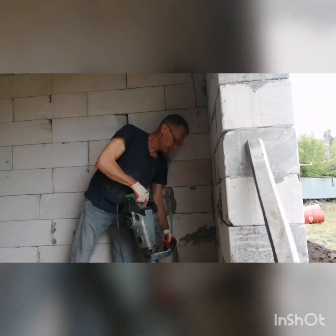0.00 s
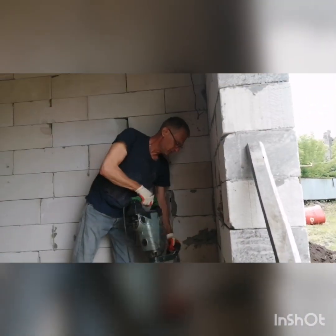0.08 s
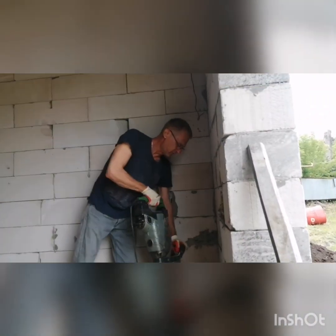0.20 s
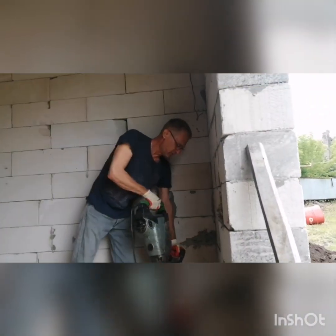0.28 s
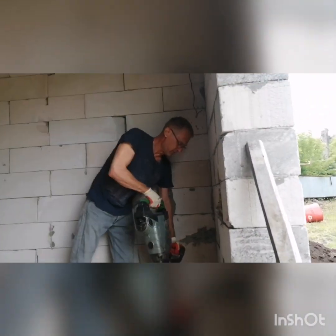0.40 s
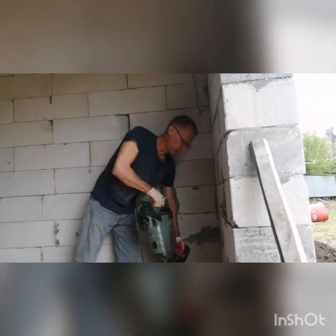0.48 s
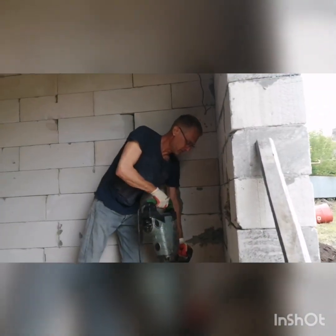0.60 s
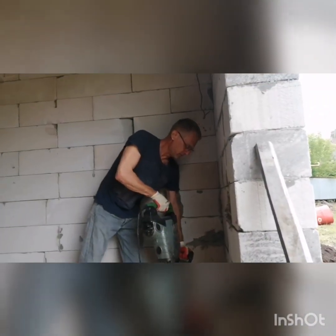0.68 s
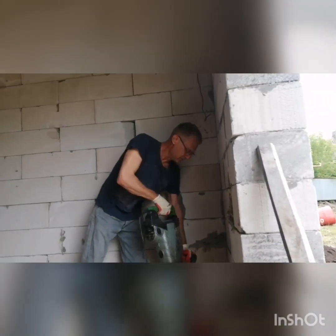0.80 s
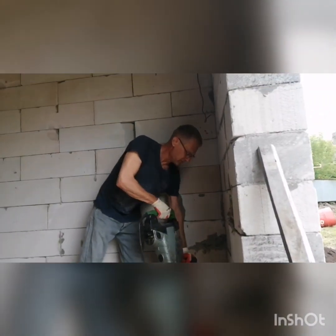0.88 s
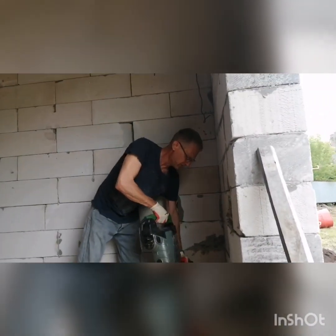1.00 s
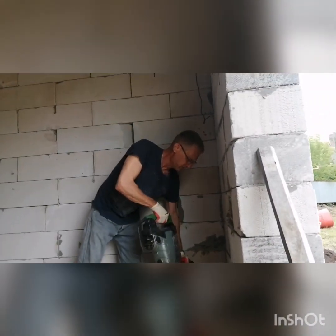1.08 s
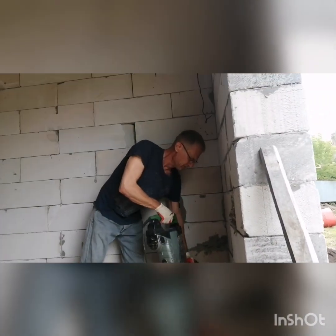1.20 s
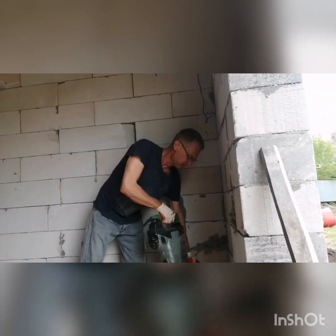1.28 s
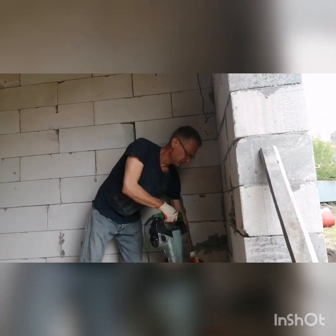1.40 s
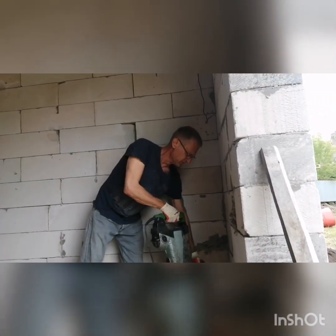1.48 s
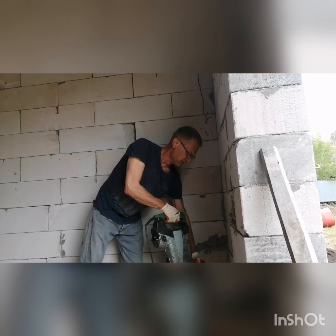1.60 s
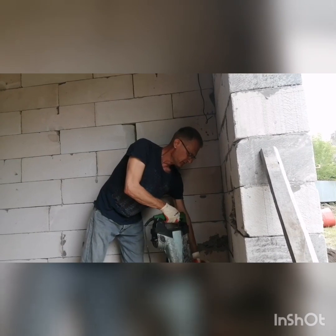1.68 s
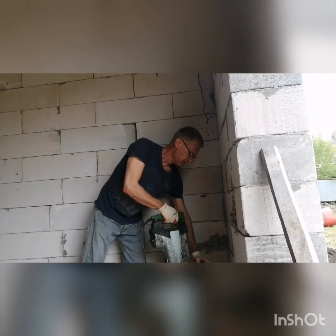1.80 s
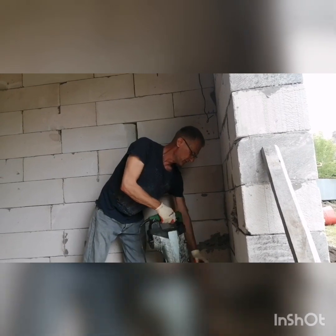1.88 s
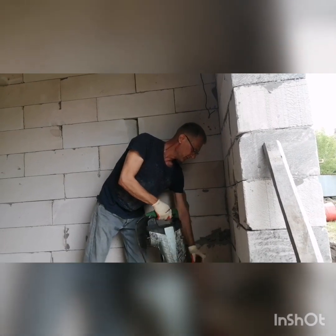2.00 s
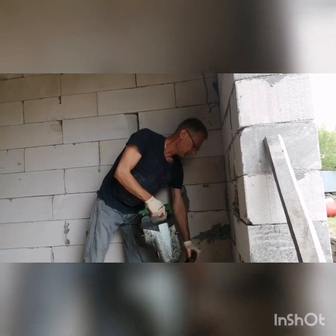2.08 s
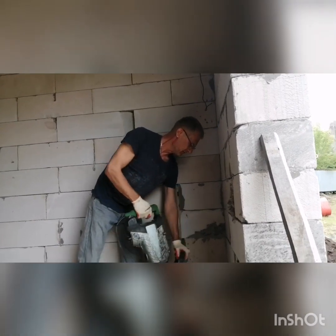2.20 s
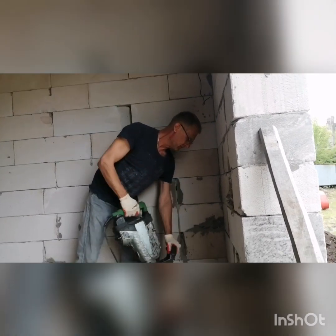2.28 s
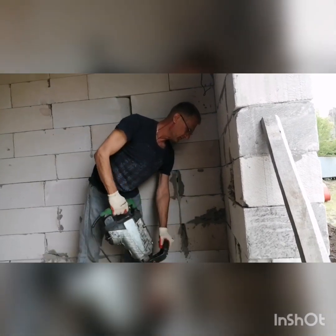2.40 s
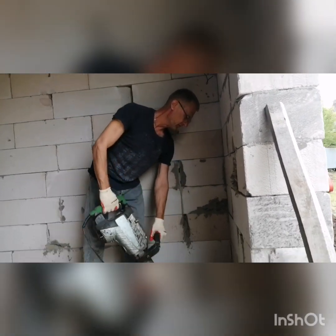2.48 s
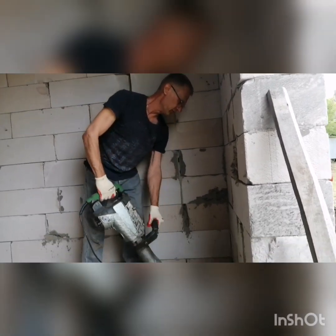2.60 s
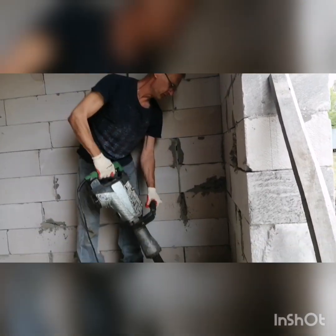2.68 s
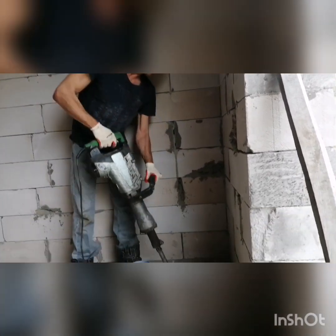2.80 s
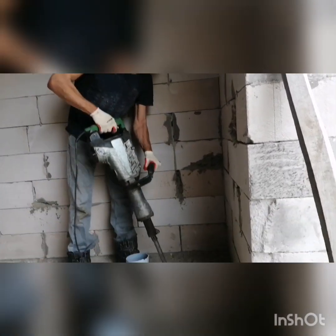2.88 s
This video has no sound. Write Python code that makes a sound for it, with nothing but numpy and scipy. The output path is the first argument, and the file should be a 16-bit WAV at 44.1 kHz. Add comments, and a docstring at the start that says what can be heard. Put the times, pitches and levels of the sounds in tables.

```python
"""In a bare block-walled room an electric demolition hammer chisels a concrete floor.
The motor spins up, the striker catches and pounds about 21 times a second, then the blows spread out
as the motor coasts down. Blows are pushes with bursts of uneven contacts, filtered for floor, housing,
slab, crack and grit; steel is summed decaying modes; the motor is noise and sines tied to its turning."""
import sys
import numpy as np
from scipy import signal
from scipy.fft import rfft, irfft, next_fast_len
from scipy.io import wavfile

SR = 44100
rng = np.random.default_rng(int(sys.argv[2]) if len(sys.argv) > 2 else 0)


def int16_out(signal):
    """Quantize to a 16-bit WAV file."""
    q = np.round(np.clip(np.atleast_2d(signal).T, -1, 1) * 32767)
    wavfile.write(sys.argv[1], SR, q.astype(np.int16))


N = 132300
T = np.arange(N) / SR  # time of each sample (s)


def from_db(db):
    """Logarithmic level: decibels become an amplitude ratio."""
    return 10 ** (np.asarray(db) / 20)


def rms_one(x):
    """Normalisation: each channel is scaled to a root-mean-square of 1."""
    return x / np.sqrt(np.mean(x ** 2, axis=-1, keepdims=True) + 1e-20)


def in_time(rows):
    """Linear interpolation: a (time, value) table becomes a curve at every sample."""
    return np.interp(T, *np.transpose(rows))


def colour(x, points):
    """Minimum-phase filtering: the folded cepstrum of an (f/Hz, level/dB) shape gives a causal filter."""
    size = next_fast_len(N + SR // 2, True)
    size += size % 2
    hz, db = np.transpose(points)
    bin_hz = np.arange(size // 2 + 1) * SR / size
    shape_db = np.interp(np.log(bin_hz + 1), np.log(hz), db)
    cepstrum = irfft(np.log(from_db(shape_db)))
    # fold the negative times onto the positive ones
    cepstrum[1:size // 2] *= 2
    cepstrum[size // 2 + 1:] = 0
    response = np.exp(rfft(cepstrum))
    return irfft(rfft(x, size) * response)[..., :N]


def stereo_noise(alike, size):
    """Interchannel correlation: mid and side white noise mix to a likeness from -1 to 1."""
    mid, side = rng.standard_normal((2, size))
    common = np.sqrt(1 + alike) * mid
    opposed = np.sqrt(1 - alike) * side * [[1], [-1]]
    return (common + opposed) / np.sqrt(2)


def drift(rate_hz):
    """Low-passed random process: two equal poles smooth white noise into a wander of rms 1."""
    pole = np.exp(-2 * np.pi * rate_hz / SR)
    noise = rng.standard_normal(N + SR)
    wander = signal.lfilter([1], [1, -2 * pole, pole * pole], noise)
    return rms_one(wander[SR:])  # drop the settling time


def room(x, wet_db, t60, alike):
    """Reverberation: after the first wall reflection, a dense tail falls 60 dB in t60 seconds."""
    t = T[:SR]
    onset = np.clip((t - 0.003) / 0.0016, 0, 1)
    tail = stereo_noise(alike, size=SR) * from_db(-60 * t / t60) * onset
    response = from_db(wet_db) * rms_one(tail) / np.sqrt(SR)  # tail energy relative to the direct sound
    response[:, 0] += 1  # direct sound
    return signal.fftconvolve(np.atleast_2d(x), response, axes=-1)[:, :N]


def with_energy(x, levels_db, gain_db):
    """Energy summation: a layer gets the total energy of its events, each counted over 30 ms."""
    event_s = 0.03
    total_rms = np.sqrt(np.sum(from_db(levels_db) ** 2) * event_s * SR / N)
    return from_db(gain_db) * rms_one(x) * total_rms


def contacts(times, levels_db, push, decay_s, rise_s, lead_s, grain_db, alike, repeat):
    """Impulsive excitation: a clean push and a burst of uneven contacts, partly the same rattle each time."""
    out, t = np.zeros((2, N + SR)), T[:SR // 10]
    rattle = stereo_noise(alike, size=len(t))
    shape = np.exp(-(t / decay_s) ** 1.58) * (1 - np.exp(-t / rise_s))
    for s, db in zip(times, levels_db):
        sizes = from_db(grain_db * np.clip(rng.standard_normal(len(t)), -2, 2))
        fresh = rms_one(stereo_noise(alike, size=len(t)) * sizes)
        rough = np.sqrt(repeat) * rattle + np.sqrt(1 - repeat) * fresh
        burst = rms_one(rough * shape) / np.sqrt(len(t))
        burst[:, 0] += push
        start = int((s - lead_s) * SR)
        out[:, start:start + len(t)] += from_db(db) * burst
    return out[:, :N]


def steel(times, levels_db, modes, vary_db, rise_s):
    """Modal synthesis: each strike rings decaying sines whose strengths vary; tip load detunes them a little."""
    out, t = np.zeros((2, N + SR)), T[:SR // 4]
    hz, mode_db, t60 = np.transpose(modes)[:, :, None]
    decay = from_db(mode_db - 60 * t / t60) * (1 - np.exp(-t / rise_s))
    for s, db in zip(times, levels_db):
        strength, detune, phase, spread = rng.standard_normal((4, len(modes), 1))
        angle = 2 * np.pi * (hz * (1 + 0.0016 * detune) * t + phase)
        partials = from_db(vary_db * strength) * decay
        offset = 0.71 * spread  # opposite phase offsets in the two channels (rad)
        ring = np.array([(partials * np.sin(angle + side * offset)).sum(0) for side in (-1, 1)])
        start = int(s * SR)
        out[:, start:start + len(t)] += from_db(db) * rms_one(ring)
    return out[:, :N]


def rumble():
    """Coloured noise: a faint steady rumble, identical in both channels."""
    shape = [(20, -19), (120, -24), (400, -8.5), (1500, -14), (15000, -30)]  # f/Hz, relative level/dB
    return from_db(-66.5) * rms_one(colour(stereo_noise(alike=1.0, size=N), shape))


# motor speed: [t/s, share of full speed]
SPEED_CURVE = [(0, 0.49), (.1, 0.61), (.2, 0.65), (.25, .76), (.3, 0.86), (.35, .96), (.55, 0.96),
               (1.75, 0.92), (2.1, .8), (2.4, 0.67), (2.62, 0.56), (3, 0.31)]


def rotor_angle():
    """Phase integration: the slightly unsteady turning rate accumulates to the rotor angle in radians."""
    full_speed_hz = 372
    turning_hz = full_speed_hz * in_time(SPEED_CURVE) * (1 + 0.0055 * drift(23.8))
    return 2 * np.pi * np.cumsum(turning_hz) / SR


# spectrum of the fan and brush noise: [f/Hz, relative level/dB]
WHIRR_COLOUR = [(40, -50), (70, -21), (190, -21.5), (300, -8.5), (400, -6), (950, -9.5), (1130, -1),
                (1260, -6), (1500, -8), (1900, -1.5), (2300, 2), (2650, 0), (2950, -2), (3500, -3.5),
                (3850, -13), (4400, -5), (5700, -4), (6300, -8), (7300, -11.5), (9000, -21.5),
                (14200, -21.5), (16000, -29)]
# level of the fan and brush noise: [t/s, level/dB]
WHIRR_LEVEL = [(0, -44.5), (.035, -43), (.085, -38.5), (.17, -45), (.21, -39), (.228, -33), (.27, -36),
               (.32, -28.5), (.42, -58), (.7, -45), (1.0, -44.5), (1.75, -49.5), (2.1, -48.5), (2.4, -50.5),
               (2.62, -55), (2.84, -62.5), (2.95, -59.5), (3, -58)]


def whirr(turn):
    """Amplitude modulation: fan and brush noise pulses at each turn, over harmonics 3 to 23 of the rotor."""
    rush = stereo_noise(alike=0.42, size=N) * (1 + 0.13 * np.sin(turn)) * from_db(1.57 * drift(58))
    orders = sum(np.sin(k * turn + rng.uniform(0, 2 * np.pi, (2, 1))) for k in np.arange(3, 24))
    mixed = rush + from_db(-12.5) * rms_one(orders)
    return from_db(in_time(WHIRR_LEVEL)) * rms_one(colour(mixed, WHIRR_COLOUR))


# level of the gear whine before flutter and room: [t/s, level/dB]
GEAR_CURVE = [(0, -55), (.1, -57), (.17, -56), (.23, -54), (.30, -34.5), (.33, -35), (.36, -51), (.7, -43),
              (1.1, -58), (2.0, -61), (2.6, -88), (3, -74)]


def gear_whine(turn):
    """Tooth-meshing frequency: seven teeth per turn make a fluttering whine that follows the speed."""
    whine = np.sin(7 * turn + 0.79 * drift(210)) * (1 + 0.5 * drift(90))
    return room(from_db(in_time(GEAR_CURVE)) * whine, wet_db=-9, t60=0.093, alike=0.8)


# level of the low hum: [t/s, level/dB]
HUM_CURVE = [(0, -66.5), (.3, -57.5), (.6, -41), (1.0, -52.5), (1.8, -52.5), (2.2, -56), (2.48, -55),
             (2.6, -63), (2.7, -77), (3, -77)]


def hum(turn):
    """Random phase and amplitude modulation: a sine at the turning rate becomes a rough low hum."""
    rough = np.sin(turn + 1.63 * drift(49.6)) * (1 + 0.5 * drift(27))
    return from_db(in_time(HUM_CURVE)) * rms_one(rough)


def motor():
    """Common drive: whirr, gear whine and hum all follow one rotor angle."""
    turn = rotor_angle()
    return whirr(turn) + gear_whine(turn) + hum(turn)


# level of the singing cover before the room: [t/s, level/dB]
COVER_CURVE = [(0, -63), (.05, -58), (.095, -44.5), (.16, -63), (.21, -59), (.24, -46), (.30, -47),
               (.36, -47), (.6, -64), (3, -92)]


def cover():
    """Narrow-band resonance: two slow drifts in quadrature make the motor cover waver around one pitch."""
    phase = 2 * np.pi * 1143 * T  # 1143 Hz
    sing = rms_one(drift(36) * np.sin(phase) + drift(48) * np.cos(phase))
    return room(from_db(in_time(COVER_CURVE)) * sing, wet_db=-6, t60=0.14, alike=0.77)


# light knocks of the tool as it is set down and lifted: [t/s, relative level/dB]
KNOCK_EVENTS = [(0.224, -52), (0.312, -51), (2.672, -58), (2.679, -53)]
# spectrum of the knocks and of the slab under the blows: [f/Hz, relative level/dB]
SLAB_COLOUR = [(200, -43.5), (400, 4.5), (600, 3), (800, 2), (1000, -0.5), (1280, 1.5), (1520, -10),
               (2200, -9), (5000, -106)]


def knocks():
    """Filtered impact: almost the same short contact each time gives dull knocks of the tool body."""
    s, db = np.transpose(KNOCK_EVENTS)
    hits = contacts(s, db, push=0.72, decay_s=0.006, rise_s=0.0012, lead_s=0.0011,
                    grain_db=12, alike=1.0, repeat=0.9)
    wet = room(colour(hits, SLAB_COLOUR), wet_db=-7.5, t60=0.16, alike=1.0)
    return with_energy(wet, db, gain_db=-4)


# blows while the tool is pressed down hard: [t/s, relative level/dB]
BARREL_BLOWS = [(0.292, -42), (0.3127, -36), (0.3405, -26.5), (0.4135, -39), (0.459, -33), (0.5095, -30),
                (0.5565, -33.5), (0.604, -29.5), (0.6505, -30), (0.6975, -31), (0.747, -32), (0.797, -33.5),
                (0.845, -34.5)]
# barrel modes: [f/Hz, relative level/dB, t60/s]
BARREL_MODES = [(1920, -16, 0.018), (2220, -2, 0.032), (2356, -2.5, .025), (2660, -1, .02),
                (2820, 0.5, .025), (3020, -1, 0.022), (3140, -2, 0.02), (3474, -8.5, 0.038),
                (5500, -17, 0.013), (5900, -19, 0.013), (7140, -2, 0.028)]


def barrel():
    """Strongly damped modes: the steel barrel gives a short hard bark."""
    s, db = np.transpose(BARREL_BLOWS)
    bark = steel(s, db, BARREL_MODES, vary_db=2.5, rise_s=0.001)
    return with_energy(room(bark, wet_db=-7.5, t60=0.19, alike=0.13), db, gain_db=-1)


# blows: [t/s, then relative level/dB of crack, thump, housing, slab, chisel ring and grit]
BLOW_EVENTS = [(0.3398, -19, -54, -32, -33.5, -50, -39), (0.3634, -21.5, -50, -57, -38, -31, -30),
               (0.414, -21, -59, -38, -34, -24, -32.5), (0.4593, -18, -58, -33.5, -31.5, -26.5, -33),
               (0.5087, -16.5, -46, -36.5, -31, -26, -31.5), (0.5564, -17, -65, -35, -32, -30, -32),
               (0.603, -17, -57, -40, -32.5, -25.5, -30.5), (0.6508, -19, -49, -33.5, -28.5, -31, -32),
               (0.697, -17, -64, -34, -27.5, -25, -34), (0.7467, -21, -62, -36.5, -29.5, -40, -34),
               (0.7956, -21.5, -48, -43, -34, -22.5, -32), (0.8435, -19.5, -51, -37.5, -36.5, -23, -37.5),
               (0.8916, -19, -67, -41, -38, -31, -34), (0.939, -21.5, -61, -44, -51, -27, -35),
               (0.99, -22.5, -57, -58, -49, -28.5, -32), (1.0314, -23.5, -57, -39, -43, -29.5, -36),
               (1.0732, -23, -58, -41, -43.5, -29.5, -33), (1.1207, -20.5, -48.5, -35.5, -46.5, -27.5, -34),
               (1.1672, -24, -64, -41, -51, -34, -34), (1.2171, -22, -67, -41, -42.5, -32, -34.5),
               (1.2652, -21.5, -65, -33, -39.5, -33, -34.5), (1.3129, -21.5, -61, -41.5, -51, -26.5, -36),
               (1.3615, -22.5, -63, -37, -47.5, -30, -33.5), (1.4066, -26.5, -51, -49, -45, -27, -33.5),
               (1.4581, -23, -68, -40, -48, -35, -32), (1.505, -24, -61, -49, -46.5, -26, -34),
               (1.5541, -20.5, -64, -39.5, -43.5, -32, -34.5),
               (1.6082, -21.5, -60, -35.5, -45, -25.5, -33.5), (1.6563, -23, -60, -41.5, -46, -26, -34),
               (1.7042, -23.5, -71, -41.5, -45, -32.5, -34.5),
               (1.7483, -25.5, -59, -37.5, -51, -26.5, -34.5),
               (1.7983, -25, -54.5, -41.5, -46.5, -27.5, -34.5), (1.8569, -26, -56, -50, -57, -28.5, -34),
               (1.9222, -28, -66, -41.5, -50.5, -33.5, -36), (1.9956, -27, -61, -48, -55, -27.5, -36.5),
               (2.0776, -25, -63, -39.5, -48.5, -30, -38), (2.1776, -22, -63, -38, -45, -34.5, -37),
               (2.3012, -23, -67, -38, -45.5, -33, -40), (2.4656, -26.5, -80, -46, -55, -39, -44.5),
               (2.6969, -32, -74, -60, -64, -27, -43)]
BLOW_S, CRACK_DB, THUMP_DB, HOUSING_DB, SLAB_DB, RING_DB, GRIT_DB = np.transpose(BLOW_EVENTS)
# the loose chisel clinks in its holder: [t/s, relative level/dB]
CLINK_EVENTS = [(0.312, -35), (1.937, -28.5), (2.643, -48.5), (2.655, -44.5), (2.750, -57), (2.915, -59.5)]
# main chisel modes: [f/Hz, relative level/dB, t60/s]
CHISEL_MODES = [(6600, -3, 0.042), (6608, -2.5, 0.071), (6670, 1.5, 0.062), (6783, 1, 0.094),
                (6940, -3.5, 0.052), (7195, -13, 0.043)]
# further chisel modes: [f/Hz, relative level/dB, t60/s]
FURTHER_MODES = [(4440, -4, 0.082), (9460, -5, 0.087), (9620, -1.5, 0.033), (9710, -10, 0.067),
                 (12640, -2.5, 0.13), (12820, 1, 0.093), (14300, 3.5, 0.15), (13500, 2, 0.095)]


def chisel():
    """Free vibration: main modes ring at every blow and clink, further modes with the grit of each blow."""
    s, db = np.vstack([np.c_[BLOW_S, RING_DB], CLINK_EVENTS]).T
    main = steel(s, db, CHISEL_MODES, vary_db=2.5, rise_s=0.0011)
    main = room(main, wet_db=0.5, t60=0.31, alike=0.089)
    further = steel(BLOW_S, GRIT_DB, FURTHER_MODES, vary_db=2.0, rise_s=0.00079)
    further = room(further, wet_db=2, t60=0.25, alike=0.1)
    return with_energy(main, db, gain_db=-3.5) + with_energy(further, GRIT_DB, gain_db=-10)


# spectrum of the housing: [f/Hz, relative level/dB]
HOUSING_COLOUR = [(60, -42), (125, -7), (160, -13), (190, 0), (255, 0), (290, -2.5), (380, -3.5),
                  (460, -9.5), (700, -26.5), (2000, -65)]


def housing():
    """Structure-borne sound: each blow knocks the housing, loudest at 190-255 Hz."""
    hits = contacts(BLOW_S, HOUSING_DB, push=1.6, decay_s=0.033, rise_s=0.0016, lead_s=0.0025,
                    grain_db=1, alike=0.67, repeat=0.36)
    wet = room(colour(hits, HOUSING_COLOUR), wet_db=0, t60=0.78, alike=1.0)
    return with_energy(wet, HOUSING_DB, gain_db=-5)


# spectrum of the floor thump: [f/Hz, relative level/dB]
THUMP_COLOUR = [(15, -3), (30, -3.5), (60, -5), (100, -8.5), (140, -4.5), (200, -15.5), (500, -57)]


def thump():
    """Low-frequency impact response: each blow pushes the floor into a deep thump."""
    hits = contacts(BLOW_S, THUMP_DB, push=0.9, decay_s=0.013, rise_s=0.001, lead_s=0.0022,
                    grain_db=5, alike=-0.29, repeat=0.2)
    wet = room(colour(hits, THUMP_COLOUR), wet_db=-8.5, t60=0.29, alike=0.3)
    return with_energy(wet, THUMP_DB, gain_db=3.5)


def slab():
    """Mid-band impact response: the slab answers each blow with a short, largely repeatable knock."""
    hits = contacts(BLOW_S, SLAB_DB, push=1.18, decay_s=0.0066, rise_s=0.00041, lead_s=0.00156,
                    grain_db=1.5, alike=0.96, repeat=0.61)
    wet = room(colour(hits, SLAB_COLOUR), wet_db=-0.5, t60=0.44, alike=1.0)
    return with_energy(wet, SLAB_DB, gain_db=-3.5)


# spectrum of the flying grit: [f/Hz, relative level/dB]
GRIT_COLOUR = [(4000, -26), (7000, 2), (8500, -2.5), (9200, -2.5), (9600, 4), (10400, -4), (11500, -3.5),
               (12700, 6), (13600, -8), (14300, 3.5), (15200, -2.5), (16000, 0.5)]


def grit():
    """Random impact noise: sprayed grit is a burst of very uneven contacts high in the treble."""
    hits = contacts(BLOW_S, GRIT_DB, push=0.05, decay_s=0.0098, rise_s=0.0024, lead_s=0.0007,
                    grain_db=8, alike=0.036, repeat=0.046)
    wet = room(colour(hits, GRIT_COLOUR), wet_db=-4.5, t60=0.3, alike=0.05)
    return with_energy(wet, GRIT_DB, gain_db=-1.5)


# spectrum of the breaking concrete: [f/Hz, relative level/dB]
CRACK_COLOUR = [(700, -21.5), (1500, -9), (1900, -2.5), (2250, -1.5), (2600, -5), (3000, -0.5),
                (3400, -4.5), (3850, -9), (4150, -4.5), (4450, 0.5), (4800, -1.5), (5400, -0.5), (6100, -3),
                (7100, -2.5), (7800, -21.5), (11000, -27.5)]


def crack():
    """Fracture noise: breaking concrete gives a brief broadband burst, mostly new at each blow."""
    hits = contacts(BLOW_S, CRACK_DB, push=0.26, decay_s=0.0049, rise_s=0.0013, lead_s=0.0003,
                    grain_db=5, alike=0.49, repeat=0.1)
    wet = room(colour(hits, CRACK_COLOUR), wet_db=1.5, t60=0.36, alike=0.034)
    return with_energy(wet, CRACK_DB, gain_db=-11.5)


# single steel modes that sing out: [t/s, f/Hz, relative level/dB, t60/s]
PING_EVENTS = [(0.3627, 2330, -32.5, 0.015), (0.3637, 6674, -25, 0.052), (0.365, 4410, -37.5, 0.061),
               (0.415, 2324, -43, 0.078), (0.415, 14123, -37, 0.18), (0.651, 4350, -33, 0.071),
               (0.65, 14123, -51, .12), (1.034, 4350, -40.5, 0.082), (1.363, 14123, -47, 0.13),
               (1.556, 3158, -47, 0.098), (1.610, 9594, -43, 0.22), (1.659, 9475, -41, 0.17),
               (1.659, 12634, -48, 0.16), (1.707, 4350, -47, .1), (1.928, 13040, -38.5, .14),
               (2.079, 2150, -46, 0.036), (2.302, 2780, -45.5, 0.035), (2.465, 4680, -43, 0.048),
               (2.697, 2350, -41.5, 0.047), (2.698, 4830, -50, 0.13), (2.701, 4490, -55, 0.18),
               (2.700, 5000, -57, 0.14), (2.645, 4380, -61, .08)]


def pings():
    """Single-mode decay: one mode of the steel sings out at each listed time."""
    out = sum(steel([s], [db], [(hz, 0, t60)], vary_db=0, rise_s=0.0005) for s, hz, db, t60 in PING_EVENTS)
    levels_db = np.array(PING_EVENTS)[:, 2]
    return with_energy(room(out, wet_db=-6, t60=0.21, alike=0.089), levels_db, gain_db=2.5)


# spectral balance, left minus right: [f/Hz, level/dB]
BALANCE_CURVE = [(60, -3), (130, -2.5), (250, 0.5), (500, -0.5), (900, -2), (1400, -6.5), (1900, -9),
                 (2400, -9), (2950, -1.5), (3600, -13), (5400, -15), (6700, -6), (8500, -2.5), (9700, -5),
                 (11500, -13), (15000, -19)]
# further broadband balance, left minus right: [t/s, level/dB]
SHIFT_CURVE = [(0, -0.5), (.3, 0.5), (.42, 4.5), (.75, 4.5), (1.1, 1.5), (1.6, 0), (2.0, -2.5), (2.45, -1),
               (2.75, 1), (3, -4)]


def placed(tool):
    """Interchannel level difference: the treble leans right while the overall balance moves with time."""
    hz, lean_db = np.transpose(BALANCE_CURVE)
    even_db = 10 * np.log10((from_db(lean_db) + from_db(-lean_db)) / 2)  # holds the summed power
    channels = []
    for channel, side in zip(tool, (1, -1)):
        leaning = colour(channel, np.c_[hz, side * lean_db / 2 - even_db])
        channels.append(leaning * from_db(side * in_time(SHIFT_CURVE) / 2))
    return np.array(channels)


def scene():
    """Superposition: all tool sounds add, are placed between the channels, and join the faint rumble."""
    blows = housing() + thump() + slab() + grit() + crack()
    tool = motor() + cover() + knocks() + barrel() + chisel() + blows + pings()
    return rumble() + placed(tool)


def record(dry):
    """Band limiting: a steep low-pass holds everything above 16.3 kHz at least 70 dB down."""
    return signal.sosfilt(signal.cheby2(16, 70, 16300, fs=SR, output="sos"), dry)


dry = scene()
out = record(dry)
int16_out(out)
```